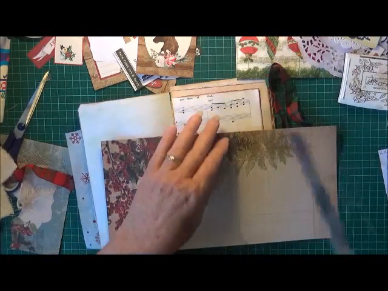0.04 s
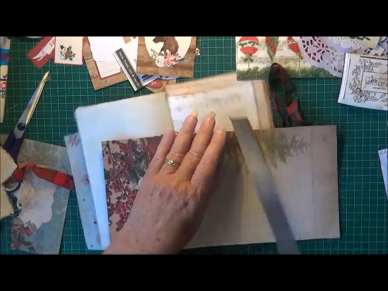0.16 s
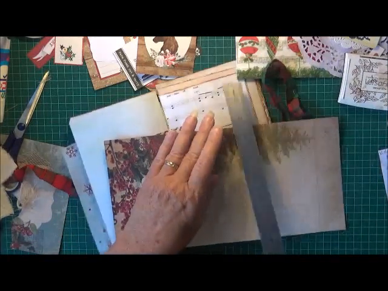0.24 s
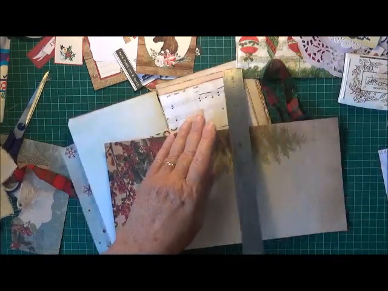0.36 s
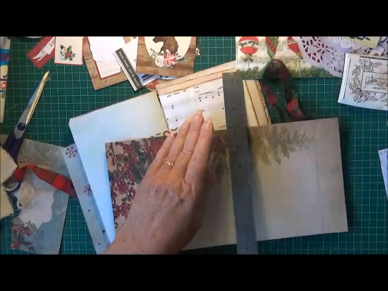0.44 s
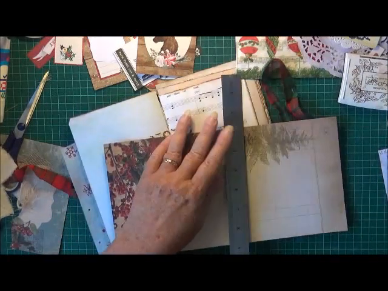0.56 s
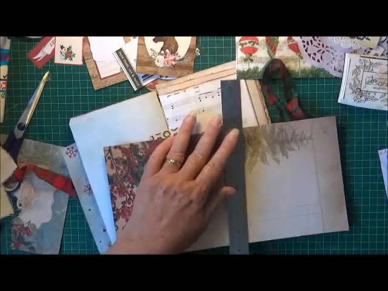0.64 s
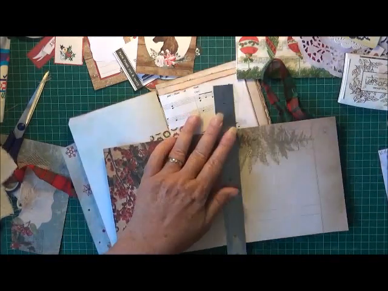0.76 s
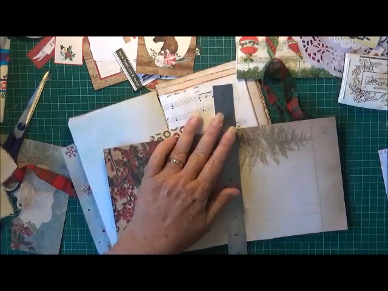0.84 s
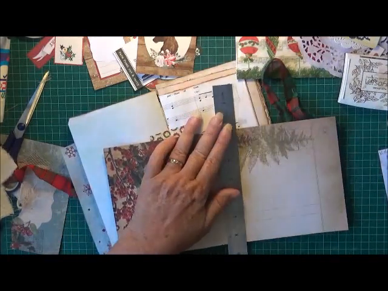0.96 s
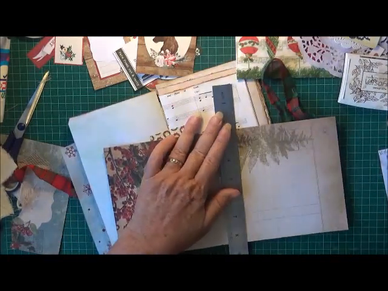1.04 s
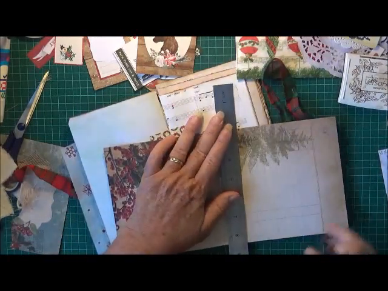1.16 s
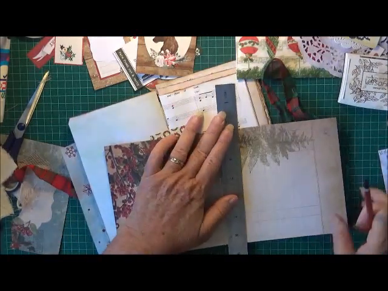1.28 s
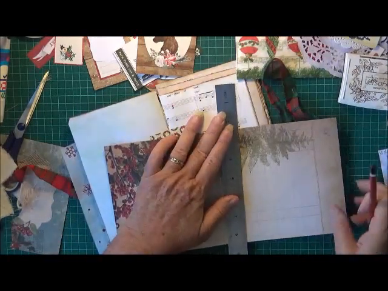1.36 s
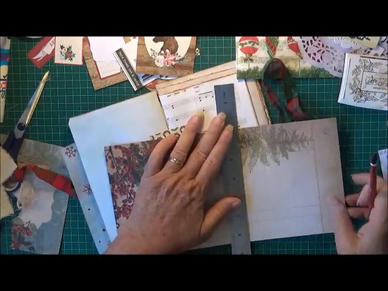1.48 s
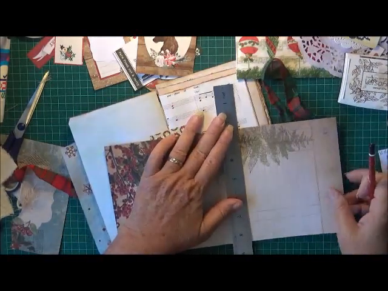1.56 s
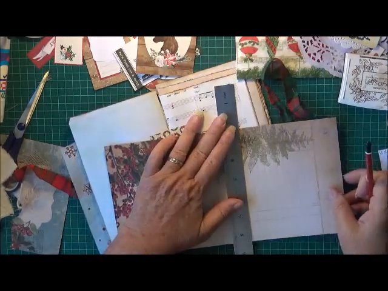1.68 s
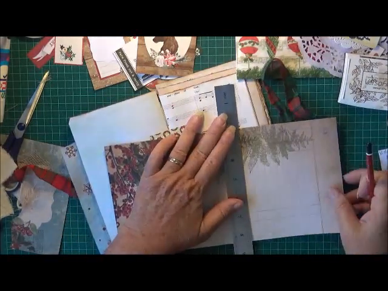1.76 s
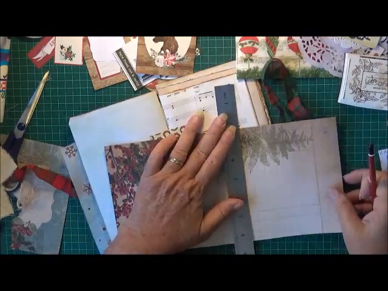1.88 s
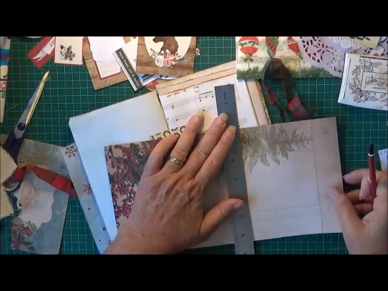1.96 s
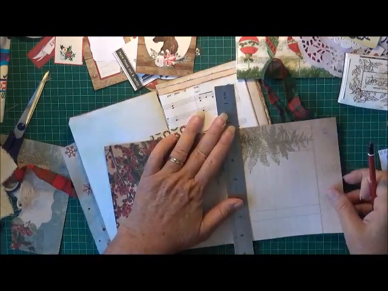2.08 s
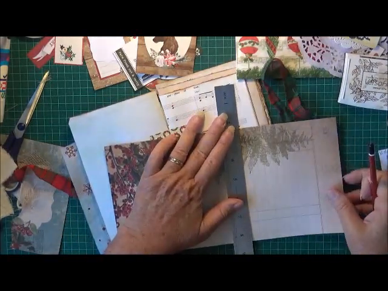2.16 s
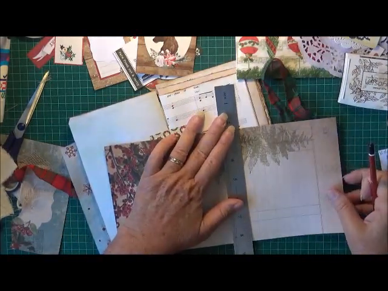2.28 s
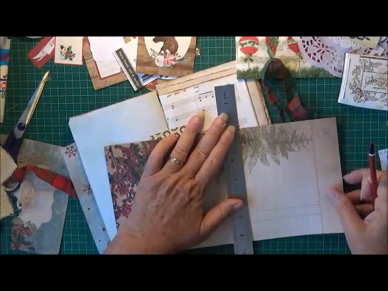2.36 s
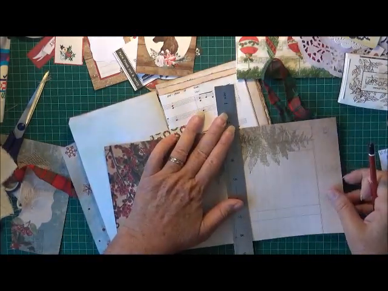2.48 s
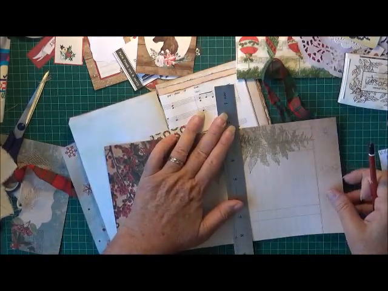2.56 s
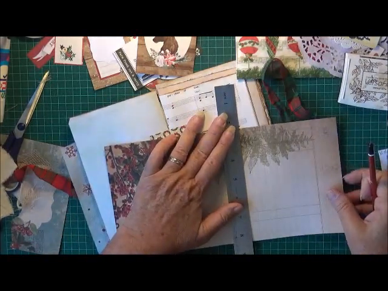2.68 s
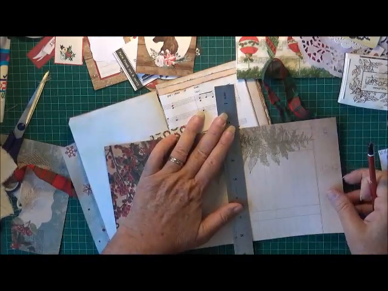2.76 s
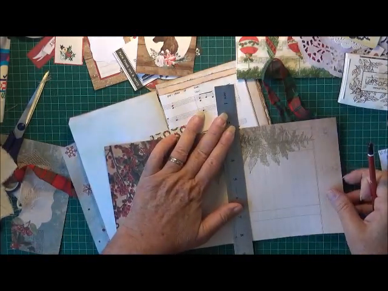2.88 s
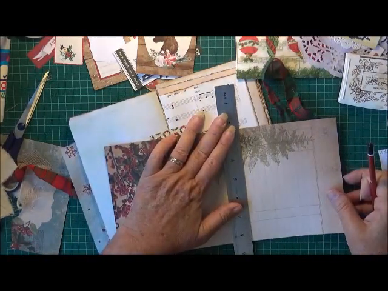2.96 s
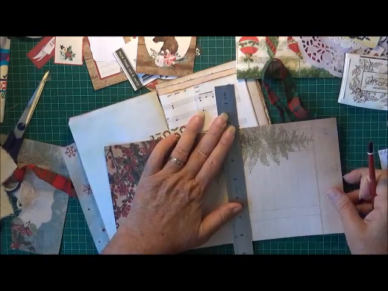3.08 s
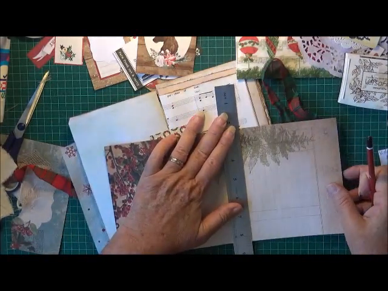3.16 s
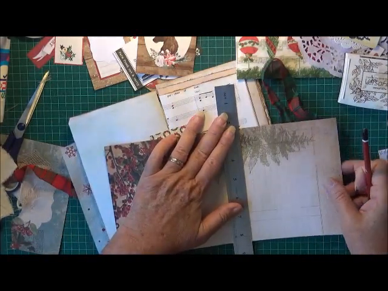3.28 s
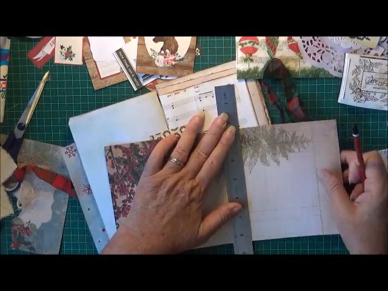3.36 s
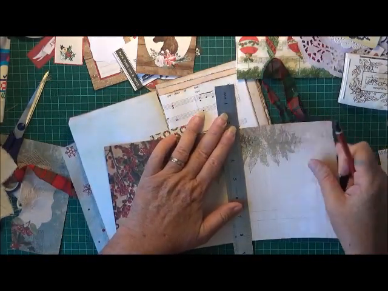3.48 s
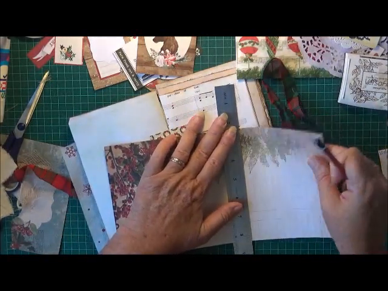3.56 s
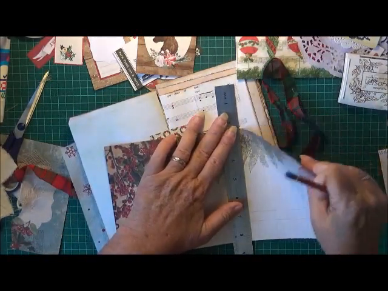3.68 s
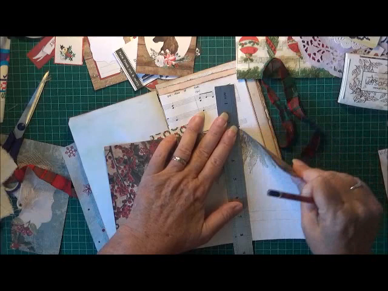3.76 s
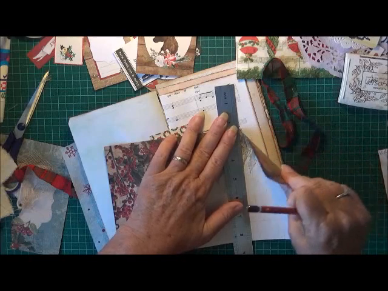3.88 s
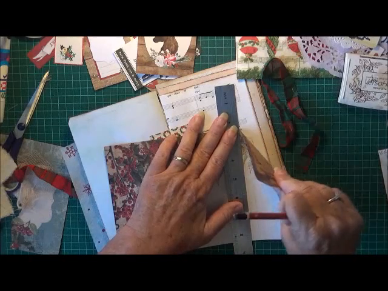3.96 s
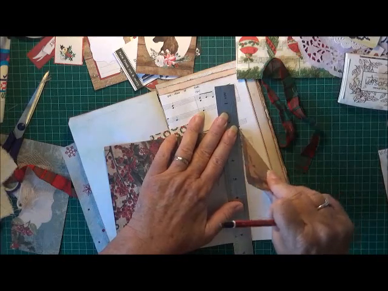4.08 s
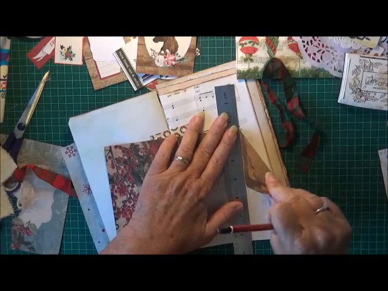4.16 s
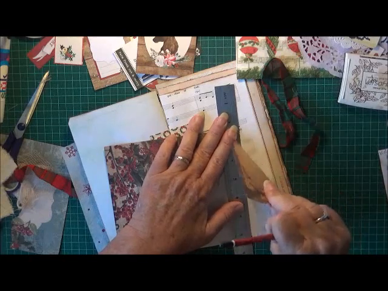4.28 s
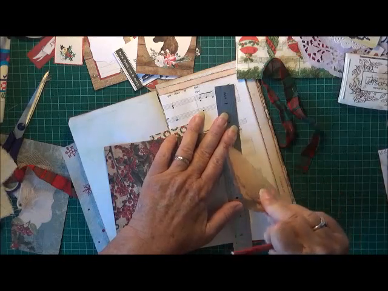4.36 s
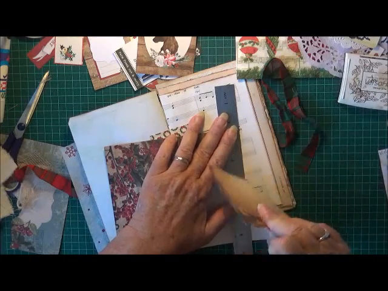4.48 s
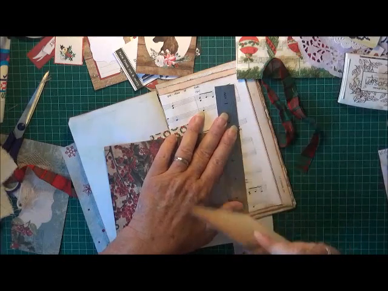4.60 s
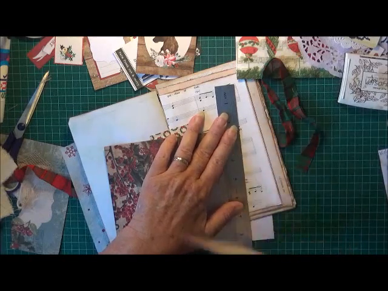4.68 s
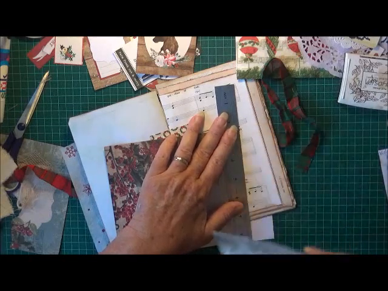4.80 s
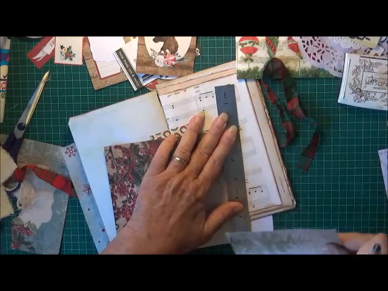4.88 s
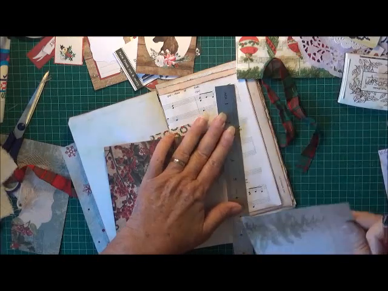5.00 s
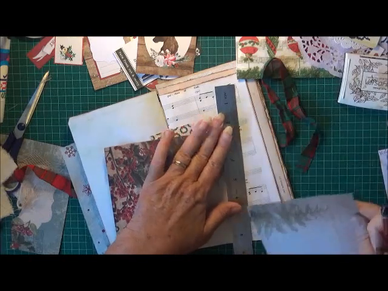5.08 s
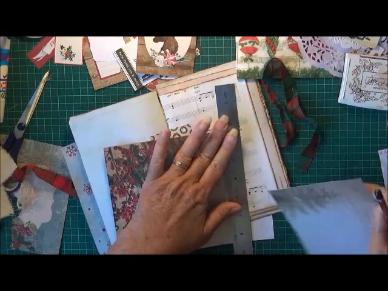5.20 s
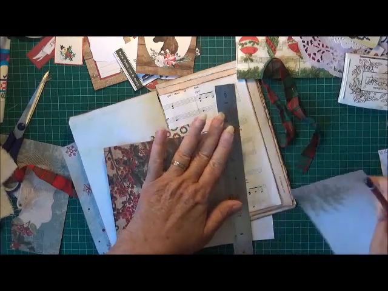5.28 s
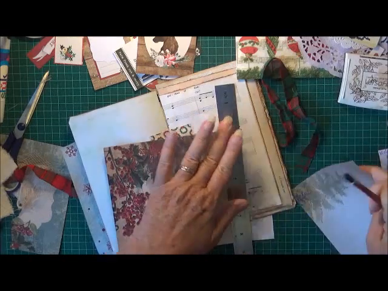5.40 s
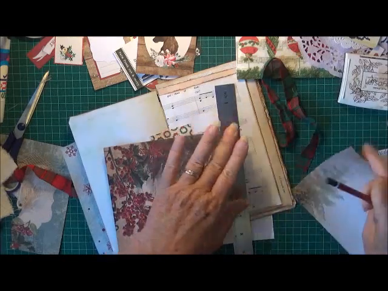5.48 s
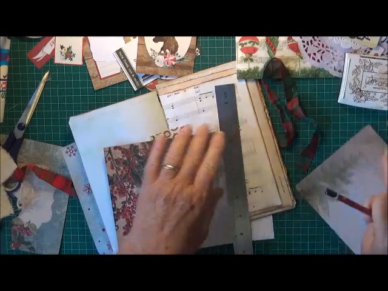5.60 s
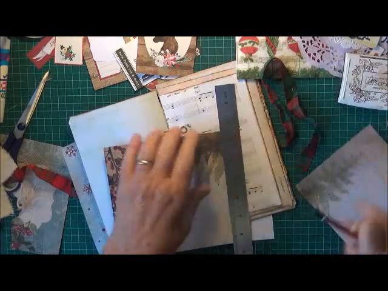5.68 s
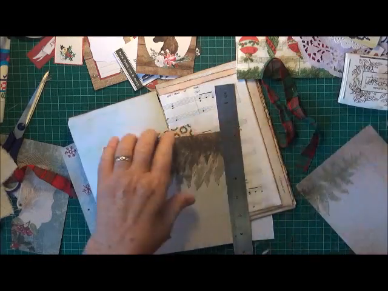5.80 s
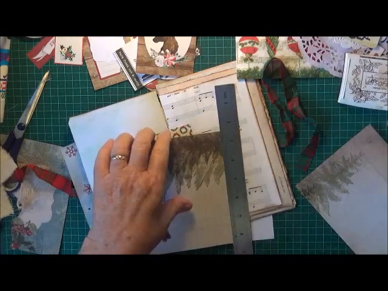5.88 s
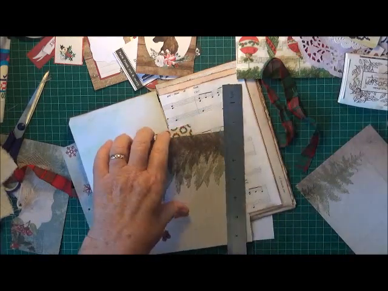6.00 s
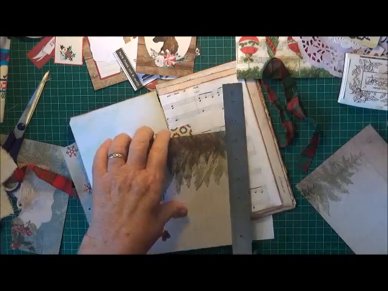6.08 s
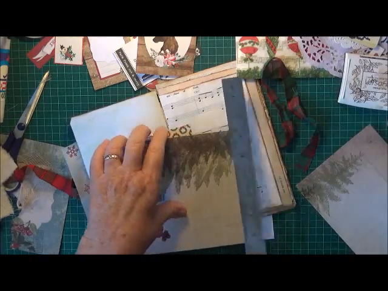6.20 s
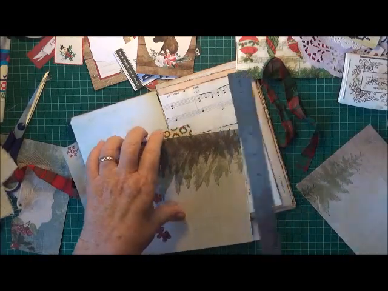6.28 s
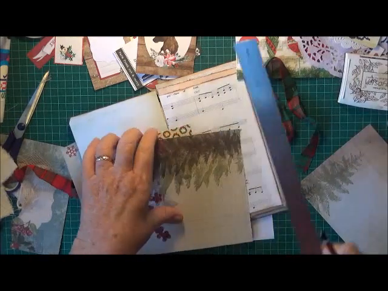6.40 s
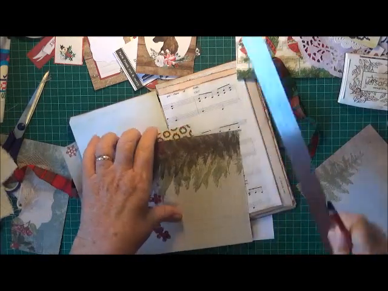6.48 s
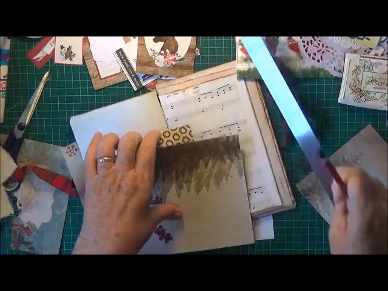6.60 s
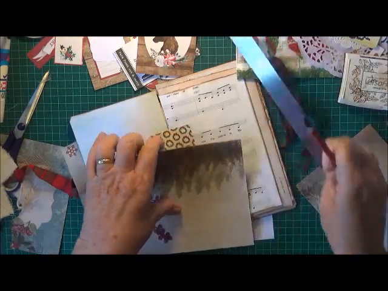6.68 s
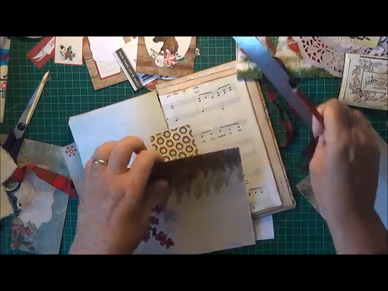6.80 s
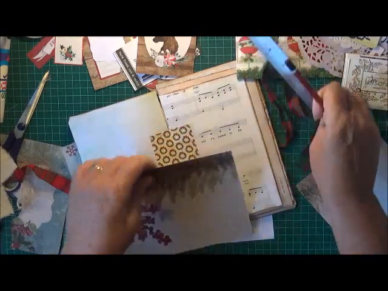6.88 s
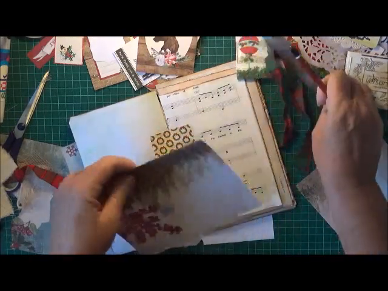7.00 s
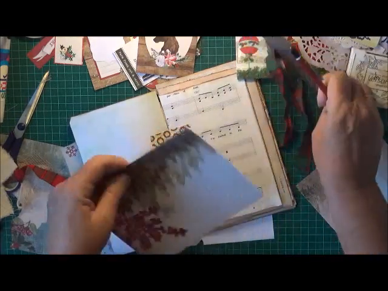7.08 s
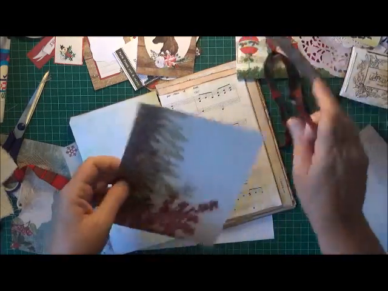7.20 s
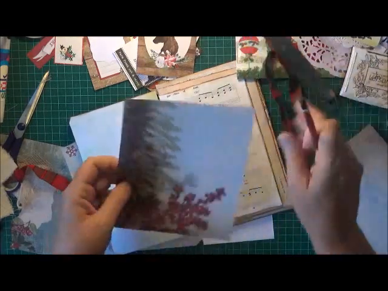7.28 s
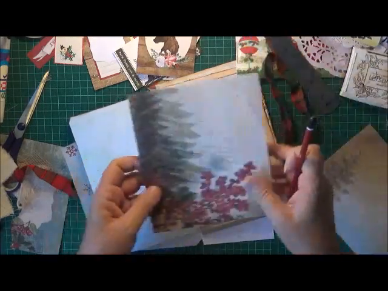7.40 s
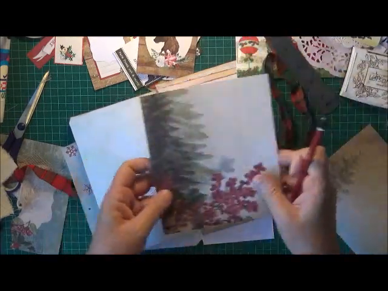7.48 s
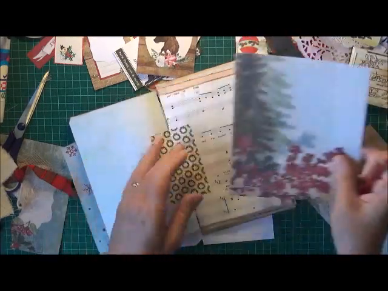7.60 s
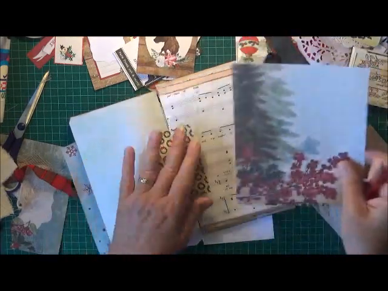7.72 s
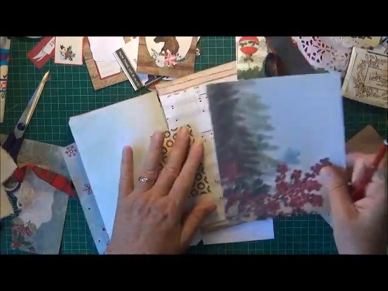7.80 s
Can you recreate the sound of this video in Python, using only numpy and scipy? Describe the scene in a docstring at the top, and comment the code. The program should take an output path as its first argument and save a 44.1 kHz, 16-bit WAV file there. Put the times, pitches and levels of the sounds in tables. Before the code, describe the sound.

A small, quiet room with soft air noise and a faint low hum, heard from just above a table. At the very start a crisp paper snap and scrape, then at about 0.3 seconds a light knock with small flicks and sliding as a ruler settles. From 0.7 to 3 seconds only faint brushes and rustle. Around 3.1 a barely audible electrical chirr begins, with small paper flicks near 3.4. At 4.1 a short rip, then from 4.25 to 4.6 a stronger, bright crackling tear, ending at 4.6 in a sharp, dull slap and brief flutter. Near 4.9 a faint low-mid tone swells and fades while paper slides and flicks until about 6. Louder sliding builds from 6.6; from 7.05 to 7.3 the steel ruler clatters in a rapid group of knocks and bright, short rings. Soft paper flicks and sliding close it.

```python
"""In a small quiet room with a low hum, a steel ruler is laid on craft paper amid filtered noise strokes and snaps.
A faint chirr of tone pulses sets in; then dense random snaps, swept by resonances, rip off a strip in two pulls.
The strip comes free with a thud and a flutter, and a faint tone swells. Paper slides and flaps over a book and
a cutting mat, and the ruler is set aside with a ringing clatter of damped sines and noise knocks.
All is heard from just above the table, with sparse room reflections."""
import sys
import numpy as np
from scipy import signal
from scipy.fft import rfft, irfft
from scipy.io import wavfile

SR = 44100
rng = np.random.default_rng(int(sys.argv[2]) if len(sys.argv) > 2 else 0)


def waveform_to_disk(signal):
    """Save audio, clipped to [-1, 1], as 16-bit WAV at the path in sys.argv[1]."""
    frames = np.transpose(np.atleast_2d(signal))
    scaled = np.clip(frames, -1, 1) * 32767
    samples = np.round(scaled).astype(np.int16)
    wavfile.write(sys.argv[1], SR, samples)


N = 346185
TIME = np.arange(N) / SR
EDGE_HZ = 11080  # upper band limit

# spectrum of the room air: f/Hz, relative density/dB per Hz
AIR_SPECTRUM = [(20, -15), (45, -7.5), (90, 2.5), (155, -0.5), (300, -7), (700, -10), (1200, -17.5),
                (1700, -14.5), (3500, -24), (11000, -31)]
AIR_DB = -60.5
# low rustle that comes and goes: t/s, level/dB
RUSTLE_LEVEL = [(0, -59.5), (.6, -59), (1.2, -66), (2.4, -62), (3.05, -75), (4.1, -73), (5, -64),
                (6, -67.5), (7.85, -71)]
# faint tone: pitch, resting level, level of the added swell, its start and length
TONE_HZ, TONE_DB, SWELL_DB, SWELL_AT_S, SWELL_S = 343, -74.5, -58.5, 4.85, 0.33

# spectrum of sliding friction: f/Hz, relative density/dB per Hz
FRICTION_SPECTRUM = [(200, -5), (600, -14.5), (1100, -2.5), (2300, -3), (3000, -3), (3700, -3), (9700, -5),
                     (11000, -6.5)]
# strokes of paper, ruler and hands sliding: start/s, length/s, level/dB, dullness/dB per octave
STROKES = [(0.062, 0.032, -28.5, -1.76), (0.163, 0.017, -71, -1), (0.232, 0.077, -48.5, 2),
           (0.327, 0.031, -48, -1), (0.392, 0.026, -48, -0.5), (0.51, 0.03, -54, -1),
           (0.543, 0.11, -45, -1.1), (0.686, 0.033, -53.5, 3), (0.756, 0.29, -63.5, 2),
           (1.083, 0.052, -55, 0.6), (1.322, 0.036, -50, 0.5), (1.405, 0.026, -54.5, 0.5),
           (1.49, 0.029, -55, 0.5), (1.766, 0.016, -58.5, 1), (3.108, 0.018, -53, 3),
           (3.197, 0.3, -61, 1.6), (3.423, 0.025, -49, 4), (3.51, 0.28, -66.5, 3.5),
           (3.777, 0.037, -59.5, 4), (3.885, 0.17, -71.5, 4), (4.847, 0.054, -51.5, -3),
           (4.928, 0.15, -53.5, -3), (5.101, 0.13, -54, 2.5), (5.238, 0.06, -47, 4),
           (5.323, 0.14, -50.5, 1.7), (5.691, 0.014, -44, 2.2), (5.844, 0.048, -41.5, -1.5),
           (5.95, 0.36, -66, -1), (6.256, 0.067, -58, 7.5), (6.361, 0.14, -55, -1.5),
           (6.589, 0.3, -47.5, -3), (6.798, 0.039, -45.5, 1.3), (6.856, 0.038, -38.5, -2.5),
           (6.947, 0.46, -49.5, -0.7), (7.496, 0.019, -44.5, 3.5), (7.674, 0.072, -53, 1.5),
           (7.744, 0.12, -47, 0)]
STROKE_RISE_S, STROKE_RELEASE_S = 0.015, 0.17
RESTING_DB = -69  # the hands never lie quite still on the paper
# reverberation of the room: f/Hz, t60/s
ROOM_DECAY = [(200, 0.41), (1400, 0.21), (9700, 0.16)]

# paper flicked, tapped and buckled: t/s, level/dB, dullness/dB per octave
FLICKS = [(0.065, -26, -0.5), (0.073, -30, 4.5), (0.247, -38, -3), (0.276, -31, 0.5), (0.295, -41, 6.5),
          (1.62, -47.5, 2), (2.105, -52, 1.5), (3.41, -42, 7), (3.43, -35.5, 4.5), (3.553, -45.5, 8),
          (4.117, -30, 0.5), (4.258, -21.5, -0.5), (4.303, -18, -3), (4.629, -27.5, 4), (4.666, -36.5, 2),
          (4.916, -34, 0), (5.221, -38, 11.5), (5.254, -33, -1.5), (5.427, -28.5, 3.5), (5.695, -37, 3),
          (5.814, -45.5, 2), (5.859, -37.5, 3), (6.266, -47, 0.5), (6.573, -41, 4), (6.812, -32, 5),
          (6.948, -41.5, 8), (7.365, -46, 2), (7.48, -36.5, 16.5), (7.486, -34, 3), (7.527, -40.5, 13),
          (7.675, -40, 1)]
# spectrum of a flick at zero dullness: f/Hz, relative density/dB per Hz
FLICK_SPECTRUM = [(240, -44), (400, -15), (2300, 0), (2640, 0), (3160, -5.5), (3890, -1.5), (7460, -3),
                  (9580, -2.5), (11000, -8), (14300, -51), (22000, -120)]
# a larger patch is duller and rings longer: length at zero dullness, dullness (dB per octave) that doubles it
FLICK_S, FLICK_DOUBLING = 0.031, 9.1
# soft blows of fingers, sheet, book and table: t/s, level/dB, centre f/Hz, t60/s
THUMPS = [(0.071, -52, 90, 0.56), (0.246, -39.5, 205, 0.17), (4.265, -33, 524, 0.2),
          (4.605, -14.5, 1730, 0.017), (4.608, -21, 820, 0.068), (4.612, -22, 211, 0.045),
          (4.613, -40.5, 82, 0.27), (4.631, -29, 276, 0.078), (7.079, -42.5, 151, 0.36),
          (7.131, -35.5, 450, 0.13), (7.29, -37.5, 602, 0.14), (7.36, -44, 780, 0.17),
          (7.424, -45, 1360, 0.068)]

# ruler landings: t/s, ring level/dB, knock level/dB, ring time/share of free t60, ring tilt/dB per octave
LANDINGS = [(0.277, -54, -51, 2.2, -26), (7.047, -36, -23.5, 0.49, -29), (7.06, -49, -27.5, 0.33, -18),
            (7.077, -18.5, -21.5, 0.96, 2.5), (7.13, -45, -29, .4, 0), (7.176, -26.5, -23, 0.2, -5),
            (7.196, -48, -36, .3, -9), (7.2324, -26.5, -28, 0.57, -17), (7.247, -32, -29, 0.44, -15),
            (7.289, -20, -31, 0.25, -10)]
# modes of the free steel: f/Hz, relative level/dB, t60/s
STEEL_MODES = [(2390, -39, 0.12), (5507, -22, 0.46), (6083, -20, .1), (6700, -17, .2), (6600, -8, 0.5),
               (6530, 1.5, 0.21), (7500, -4, .19), (7800, -14, .2), (7830, 2.5, 0.12), (8376, 0, 0.26),
               (9040, -3, 0.26), (8900, -11, 0.16), (9760, 0.5, 0.28), (10300, -22, .15), (10730, -15, .3)]
# spectrum of the ruler's knock: f/Hz, relative density/dB per Hz
KNOCK_SPECTRUM = [(59, -20), (100, -3), (284, -14), (587, -9), (804, -16), (941, -5.5), (1340, -8.5),
                  (2520, -2.5), (3060, -12), (5750, -9), (6600, 1), (7000, -8.5), (9970, -18), (11000, -19),
                  (14300, -61), (22000, -120)]

# pulls that rip the strip: start/s, length/s, time to gather speed/s, release/s, fibre level/dB, sheet level/dB
PULLS = [(4.113, 0.062, 0.002, 0.41, -31.5, -35), (4.256, 0.33, 0.061, 0.14, -26, -31.5)]
# spectrum of snapping fibres: f/Hz, relative density/dB per Hz
FIBRE_SPECTRUM = [(1290, -37), (2200, -13), (2450, -12), (3410, -5), (3520, -8), (4800, -0.5), (5280, -6.5),
                  (7010, -1.5), (8690, -1), (11000, -6), (14300, -32), (22000, -120)]
# spectrum of the shaken sheet: f/Hz, relative density/dB per Hz
SHEET_SPECTRUM = [(30, -40), (75, -10.5), (240, -1), (450, -4), (850, -3), (1300, 3), (2150, -1.5),
                  (3000, -9.5), (5000, -42)]
# resonances that the strip passes through as it curls: t/s, f/Hz, width/Hz, lift/dB
CURLS = [(4.14, 2550, 260, 6.5), (4.15, 8880, 450, 8), (4.33, 4040, 503, 10), (4.39, 2220, 200, 8),
         (4.415, 8800, 220, 1), (4.435, 3740, 456, 13), (4.525, 900, 250, 12), (4.575, 6700, 284, 8)]
SHEET_FOLLOW = 0.8  # the sheet's rattle grows with this power of the tearing speed
# the freed strip goes slack and flutters; SLACK is the ratio by which its resonances drop
FLUTTER_AT_S, FLUTTER_S, FLUTTER_RISE_S, FLUTTER_RELEASE_S = 4.648, 0.016, 0.003, 0.11
FLUTTER_DB, SLACK = -33.5, 0.82


def amp(db):
    """Decibels to gain."""
    return 10 ** (np.asarray(db) / 20)


def unit(x):
    """Scales to rms 1."""
    return x / np.sqrt(np.mean(x ** 2) + 1e-20)


def read(points, hz):
    """Reads a spectrum table on a log-frequency axis."""
    f, value = np.transpose(points)
    return np.interp(np.log(hz + 1), np.log(f + 1), value)


def curve(rows, t):
    """Reads a level curve at the times t."""
    return np.interp(t, *np.transpose(rows))


def octaves(hz, centre_hz):
    """Distance from a centre in octaves."""
    return np.log2((hz + 1) / centre_hz)


def dulling(hz):
    """Octaves from the middle of the paper's range; a dull sound tilts down along them, its bass stays put."""
    return octaves(np.maximum(hz, 900), 3000)


def add(mix, s, sound):
    """Mixes a sound in at time s."""
    part = mix[round(s * SR):][:len(sound)]
    part += sound[:len(part)]


def fall(t, t60):
    """Exponential decay of 60 dB in the time t60."""
    return np.exp(-np.log(1000) * t / t60)


def envelope(t, length, rise, release):
    """Gathers speed from t = 0, holds until length, then falls 60 dB in the release time."""
    attack = 1 - np.exp(-np.maximum(t, 0) / rise)
    return attack * fall(np.maximum(t - length, 0), release)


def burst(length, rise):
    """A quick swell of noise that falls 60 dB over its length."""
    t = TIME[:SR // 2]
    return rng.standard_normal(len(t)) * (1 - np.exp(-t / rise)) * fall(t, length)


def colour(x, gain_db, size=4096):
    """Causal filter of unit energy whose gain in dB is a function of frequency."""
    hz = abs(np.fft.fftfreq(size, 1 / SR))
    log_gain = np.log(amp(np.maximum(gain_db(hz), -100)))
    # minimum phase puts the filter's energy at the onset
    spectrum = np.exp(np.conj(signal.hilbert(log_gain)))
    taps = np.fft.ifft(spectrum).real[:size // 2]
    return signal.oaconvolve(x, taps / np.linalg.norm(taps))[:len(x)]


def flex(x, field_db, patchy_db, size=512):
    """Colours x with a moving spectrum of steady power; bending paper adds drifting patches."""
    hz, t, z = signal.stft(x, SR, nperseg=size)
    window = signal.windows.hann(M=8)
    patches = unit(signal.convolve2d(rng.standard_normal(z.shape), np.outer(window, window), "same"))
    gain = amp(field_db(hz[:, None], t) + patchy_db * patches)
    steady_gain = gain / np.sqrt(np.mean(gain ** 2, 0))
    return signal.istft(z * steady_gain, SR, nperseg=size)[1][:N]


def crackle(per_s, spread_db, smear=0.002473):
    """Random tiny snaps of uneven size; bending waves spread each over a few ms, treble first."""
    strength = amp(spread_db * np.minimum(rng.exponential(1, N), 4))
    snaps = strength * rng.choice([-1, 1], N) * (rng.random(N) < per_s / SR)
    hz = np.fft.rfftfreq(N, 1 / SR)
    delay = smear / np.sqrt(1 + hz / 1500)  # seconds
    phase = -2 * np.pi * np.cumsum(delay) * SR / N
    return unit(irfft(rfft(snaps) * np.exp(1j * phase), N))


def stereo(mid, side, width, corner_hz=700):
    """Diffuse sound at two close points: they differ in the treble, hardly in the bass."""
    side = width * signal.lfilter(*signal.butter(1, corner_hz, "highpass", fs=SR), side)
    return np.array([mid + side, mid - side])


def place(x, pan_db):
    """Left and right gains for a source, pan_db apart."""
    return x * amp([[pan_db / 2], [-pan_db / 2]])


def background():
    """Room air, a wavering hum, a faint tone that swells once and a low rustle that comes and goes."""
    air = [unit(colour(noise, lambda hz: read(AIR_SPECTRUM, hz))) for noise in rng.standard_normal((2, N))]
    knots = np.linspace(0, TIME[-1], num=40)
    waver = unit(np.interp(TIME, knots, rng.standard_normal(size=40)))
    hum = amp(-63 + 2.5 * waver) * np.sin(2 * np.pi * 49.5 * TIME)
    swell = amp(SWELL_DB) * envelope(TIME - SWELL_AT_S, SWELL_S, rise=0.066, release=0.59)
    tone_wave = np.sqrt(2) * np.sin(2 * np.pi * TONE_HZ * TIME + waver)
    tone = (amp(TONE_DB) + swell) * tone_wave
    rustle = colour(rng.standard_normal(N), lambda hz: -15 * np.log1p(octaves(hz, 305) ** 2))
    return amp(AIR_DB) * stereo(*air, width=1.0) + hum + tone + rustle * amp(curve(RUSTLE_LEVEL, TIME))


def slide():
    """Fine friction grains in uneven slips, dull when a loose sheet drags and bright when pressed flat."""
    slips = unit(signal.oaconvolve(rng.standard_normal(N), signal.windows.hann(M=1400), "same"))
    grains = crackle(per_s=7000, spread_db=2.0)
    grains += 0.17 * crackle(per_s=32, spread_db=-1.0, smear=0.0034)  # an edge catches now and then
    out = amp(RESTING_DB) * colour(grains, lambda hz: read(FRICTION_SPECTRUM, hz))
    for s, length, db, dull in STROKES:
        part = grains[round(s * SR):][:SR]
        pressure = envelope(TIME[:len(part)], length, STROKE_RISE_S, STROKE_RELEASE_S)
        stroke = colour(part * pressure, lambda hz: read(FRICTION_SPECTRUM, hz) - dull * dulling(hz))
        add(out, s, amp(db) * stroke)
    return flex(out, lambda hz, t: 0, patchy_db=2.5) * amp(1.5 * slips)


def room(x, size=256):
    """Sparse reflections, each band dying at its own speed."""
    t = TIME[:SR // 2]
    arrivals = rng.random((2, len(t))) < 2500 / SR
    taps = rng.standard_normal((2, len(t))) * arrivals * (t > .002)
    hz, when, z = signal.stft(taps, SR, nperseg=size)
    tail = signal.istft(z * fall(when, read(ROOM_DECAY, hz)[:, None]), SR, nperseg=size)[1]
    tail = tail / np.linalg.norm(tail, axis=1, keepdims=True)
    return stereo(*signal.fftconvolve(x[None], tail, axes=1)[:, :N], width=0.81)


def flicks():
    """Short dry snaps of the paper; the duller ones ring longer."""
    out = np.zeros(N)
    for s, db, dull in FLICKS:
        length = FLICK_S * 2 ** (dull / FLICK_DOUBLING)
        snap = burst(length, rise=0.04 * length)
        add(out, s, amp(db) * colour(snap, lambda hz: read(FLICK_SPECTRUM, hz) - dull * dulling(hz)))
    return out


def thumps():
    """Broad, heavily damped blows."""
    out = np.zeros(N)
    for s, db, centre_hz, length in THUMPS:
        blow = burst(length, rise=0.0014)
        add(out, s, amp(db) * colour(blow, lambda hz: -15 * np.log1p((1.09 * octaves(hz, centre_hz)) ** 2)))
    return out


def ruler():
    """Each landing knocks the table and rings the steel; contact damps, detunes and buzzes the modes."""
    out, t = np.zeros(N), TIME[:SR // 2]
    hz, mode_db, t60 = np.transpose(STEEL_MODES)[:, :, None]
    for s, ring_db, knock_db, free, tilt in LANDINGS:
        phase, detune = rng.random((2, len(STEEL_MODES), 1))
        weight = amp(mode_db + tilt * np.maximum(octaves(hz, 6000), 0))
        pitch = hz * (1 + 0.035 * max(1 - free, 0) * (detune - .5))
        modes = weight * np.sin(2 * np.pi * (pitch * t + phase)) * fall(t, t60 * free)
        ring = modes.sum(0) * np.sqrt(2) / np.linalg.norm(weight)
        ring *= 1 - np.exp(-t / 0.0013)  # soft onset
        # chatter against the table
        chatter = colour(burst(0.2, rise=0.00048), lambda f: -10 * np.log10(1 + (f / 700) ** 4))
        buzz = 1 + 0.52 * chatter
        # each spot that is hit has its own colour
        spot_db = 3 * rng.standard_normal(size=30)
        spot_hz = np.linspace(0, EDGE_HZ, len(spot_db))
        knock = colour(burst(0.11, rise=0.0015),
                       lambda f: read(KNOCK_SPECTRUM, f) + np.interp(f, spot_hz, spot_db))
        add(out, s, amp(ring_db) * ring * buzz + amp(knock_db) * knock)
    return out


def chirr(start=3.145, per_s=25, hz=3330, db=-63, fade_db=3):
    """A very faint electrical chirr of tone pulses sets in and slowly fades, by fade_db each second."""
    offset = ((TIME - start) * per_s + .5) % 1 - .5  # periods from the nearest pulse
    pulses = np.exp(-(offset / 0.12) ** 2)
    level = amp(db - fade_db * (TIME - start)) * (TIME > start)
    return level * pulses * np.sqrt(2) * np.sin(2 * np.pi * hz * TIME)


def tear():
    """Fibres snap along the ruler's edge and shake the curling strip, which flutters as it comes free."""
    fibre_gain = sheet_gain = 0
    for s, length, rise, release, fibre_db, sheet_db in PULLS:
        speed = envelope(TIME - s, length, rise, release)
        fibre_gain = np.hypot(fibre_gain, amp(fibre_db) * speed)
        sheet_gain = np.hypot(sheet_gain, amp(sheet_db) * speed ** SHEET_FOLLOW)
    snaps = crackle(per_s=6000, spread_db=2.0, smear=.004)

    def curl(hz, t, hold=0.049):
        """Lift in dB as each resonance passes within about hold seconds."""
        return sum(db * np.exp(-((t - s) / hold) ** 2 - ((hz - f) / width) ** 2) for s, f, width, db in CURLS)

    fibres = flex(snaps, lambda hz, t: read(FIBRE_SPECTRUM, hz) + curl(hz, t), patchy_db=3.5, size=768)
    sheet = flex(snaps, lambda hz, t: read(SHEET_SPECTRUM, hz) + curl(hz, t), patchy_db=3.5, size=768)
    slack = colour(snaps, lambda hz: read(SHEET_SPECTRUM, hz / SLACK))
    flutter = envelope(TIME - FLUTTER_AT_S, FLUTTER_S, FLUTTER_RISE_S, FLUTTER_RELEASE_S)
    return fibres * fibre_gain + sheet * sheet_gain + slack * amp(FLUTTER_DB) * flutter


def scene():
    """Paper near the middle of the table, the ruler's clatter a little to one side."""
    paper = slide() + flicks() + thumps() + tear()
    steel = ruler()
    direct = place(paper, pan_db=.5) + place(steel, pan_db=1.0)
    return direct + amp(-9.5) * room(paper + steel) + background() + chirr()


def record(dry):
    """Band limit: a steep low-pass takes off the extreme treble."""
    lowpass = signal.firwin(601, EDGE_HZ, window=("kaiser", 8), fs=SR)
    return signal.oaconvolve(dry, lowpass[None], "same")


dry = scene()
out = record(dry)
waveform_to_disk(out)
```